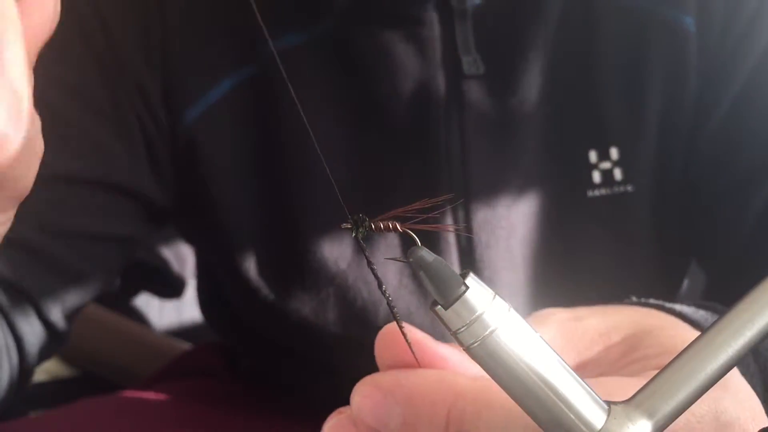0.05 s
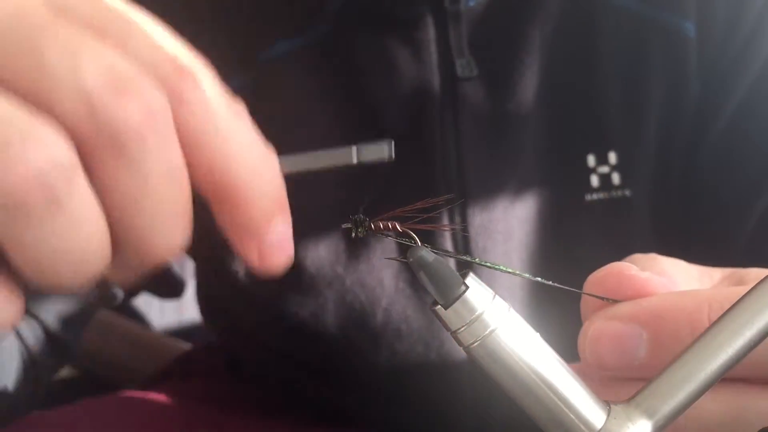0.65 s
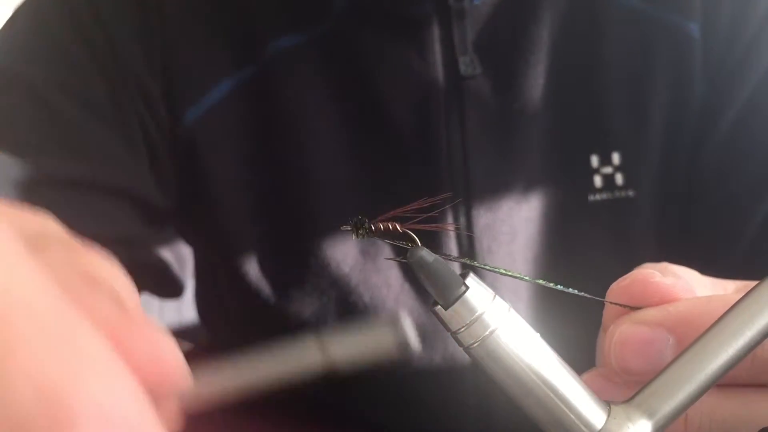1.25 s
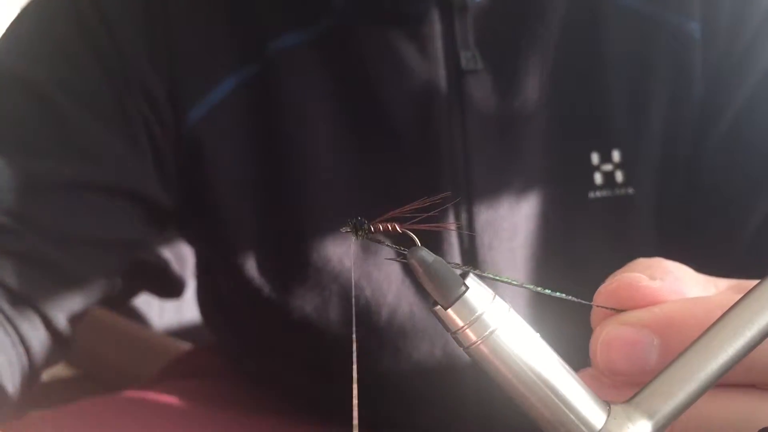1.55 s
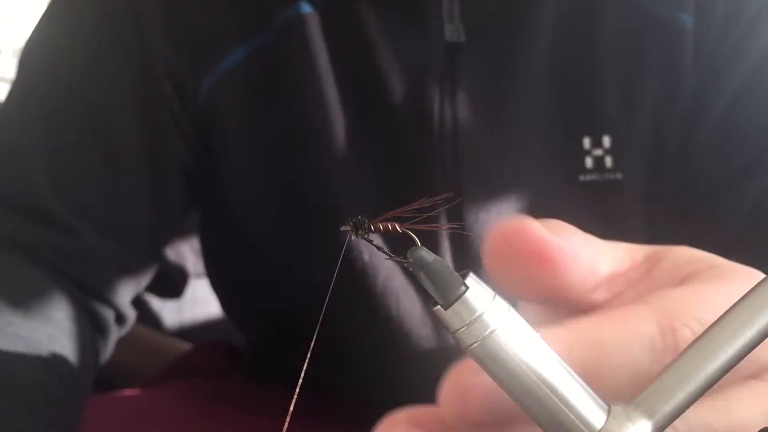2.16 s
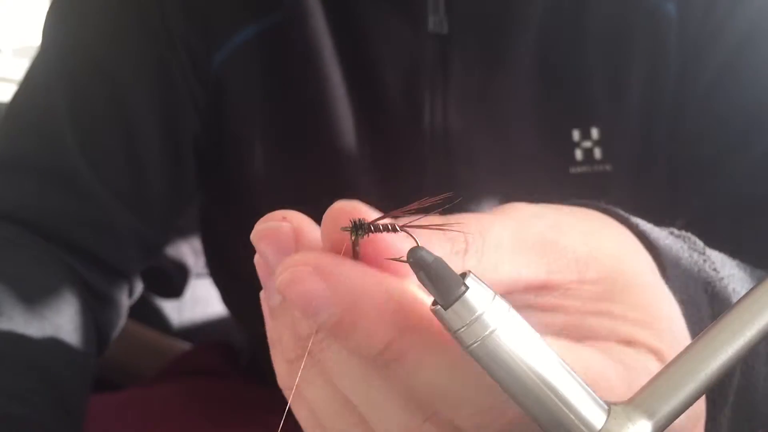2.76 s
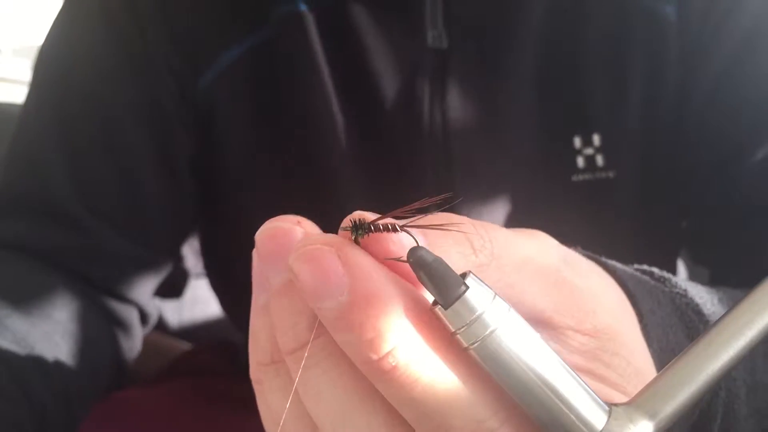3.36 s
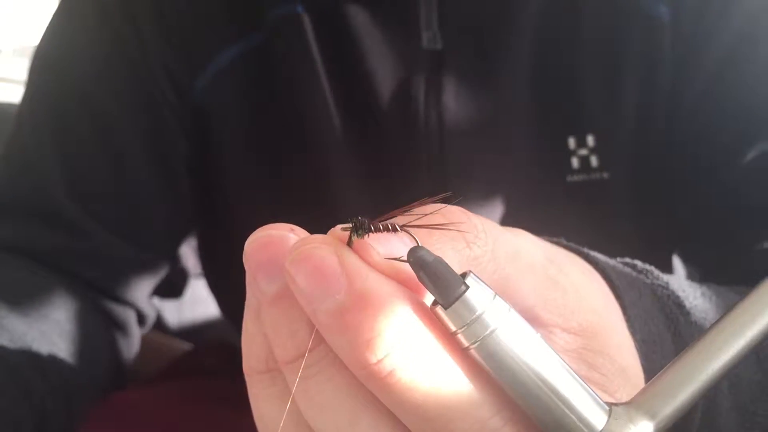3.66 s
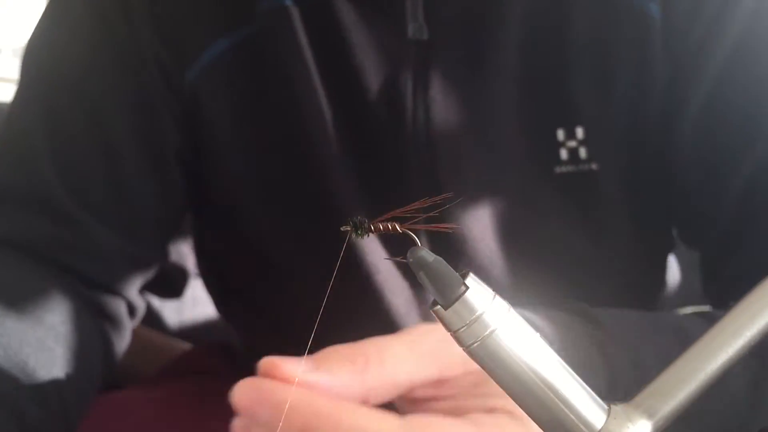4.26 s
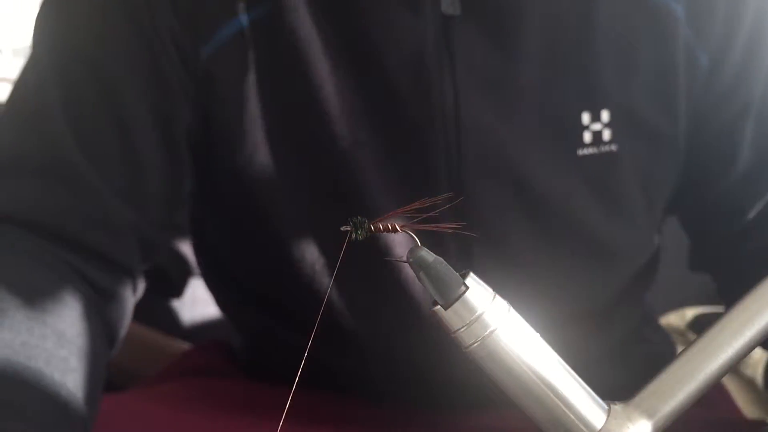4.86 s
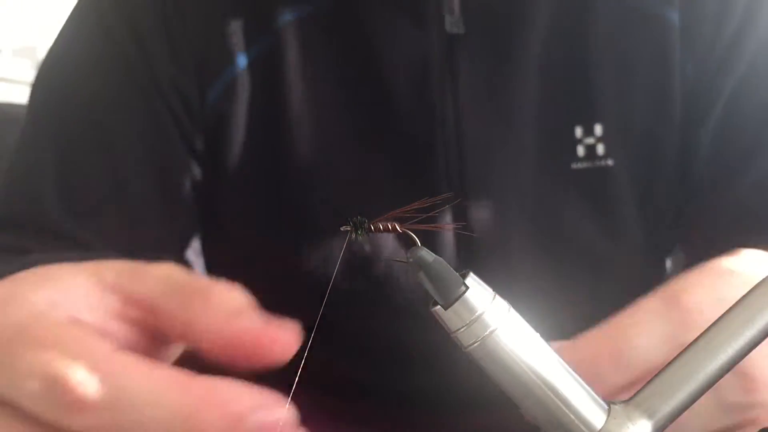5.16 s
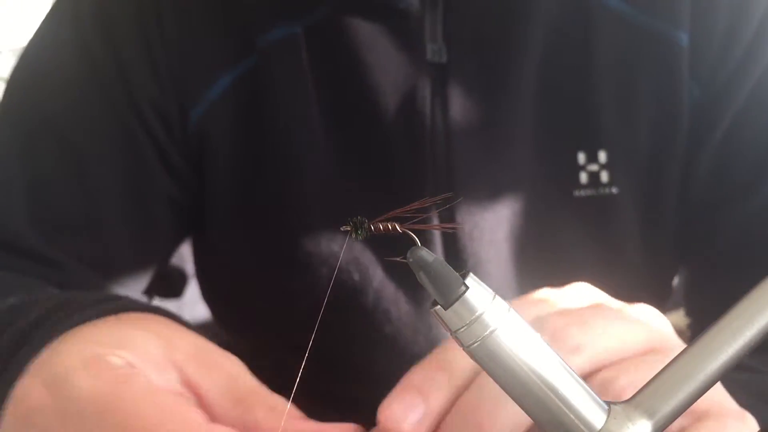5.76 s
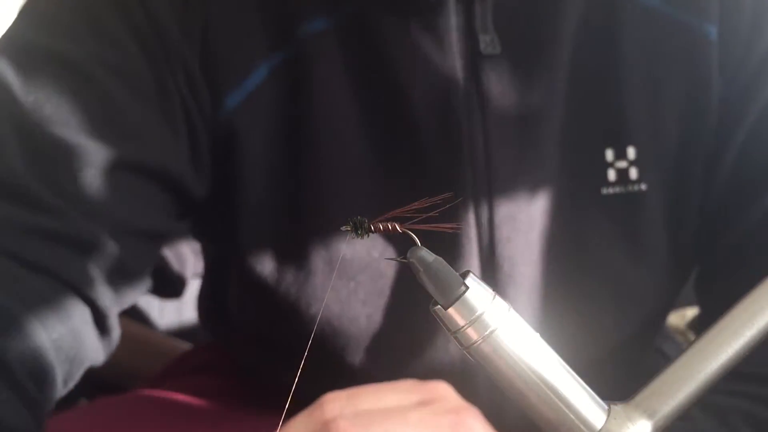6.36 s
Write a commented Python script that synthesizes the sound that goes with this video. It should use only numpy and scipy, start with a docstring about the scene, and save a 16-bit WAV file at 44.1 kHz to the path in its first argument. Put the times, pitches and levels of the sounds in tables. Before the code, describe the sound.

A small room's low rumble and faint hiss run throughout, with everything heard close by. For the first 1.7 seconds, taut thread slips in tiny, very faint creaks as it is wound. At about 1.7 seconds a hand bumps the desk with a dull thump, followed by a faint thin squeak and a soft sleeve brush. From 2.5 to 3 seconds steel tools knock on the desk in a quick, uneven cluster, each ringing briefly, the strongest near the end. A light tick rings the metal vise at 3.9 seconds. At 4.7 seconds a tool clacks sharply, followed by a light tap. Just after 5 seconds comes the loudest sound: a steel tool drops and bounces, ever faster, weaker and duller, settling within a quarter second. Faint low furniture thuds come and go, and sleeves rustle softly from about 6 seconds.

```python
"""Steel tools knock and clack on a desk during fly tying; one is dropped and bounces to rest.
Each hit is a short crack plus ringing tones, and the softer the contact, the duller it sounds.
Quieter are light taps, a tick on the metal vise, a hand bumping the desk and low furniture thuds.
Taut thread creaks as it slips, and sleeves rustle over the low rumble of a small room."""
import sys
import numpy as np
from scipy import signal
from scipy.fft import rfft, irfft
from scipy.io import wavfile
from scipy.ndimage import uniform_filter1d

SR = 44100
rng = np.random.default_rng(int(sys.argv[2]) if len(sys.argv) > 2 else 0)


def master(y):
    """Save y as 16-bit WAV."""
    cut = np.clip(np.atleast_2d(y).T, -1, 1)
    pcm = np.round(cut * 32767)  # scale
    wavfile.write(sys.argv[1], SR, pcm.astype(np.int16))


N = 283122

# Levels in tables are relative. A fade time (t60) is the time a sound takes to fall by 60 dB.
# tools landing (time [s], level [dB], treble limit [Hz], extra ring [dB], extra for second end [dB])
TOOL_KNOCKS = [(2.5104, -25, 2500, 2, -7), (2.518, -12, 6000, 0.5, -7), (2.5342, -9.5, 4700, -1, 1),
               (2.6048, -19.5, 3000, 2, -1), (2.646, -16.5, 2020, -1, 5.5), (2.658, -14, 3880, 4, -9),
               (2.872, -3.5, 2970, -3, -23), (2.8936, -11.5, 1900, -5, -11), (2.9257, -13, 10000, 3, -1)]
# tone of a knock's crack (frequency [Hz], level [dB])
KNOCK_TONE = [(60, -4.5), (140, -3), (210, 4.5), (370, -1.5), (500, 3), (950, 5.5), (1400, 2), (2100, -2),
              (2700, -4.5), (4200, -3), (6000, -5), (16000, -20.5)]
# notes a knock rings with (pitch [Hz], level [dB], fade time [s])
KNOCK_RING = [(189.4, -43, 0.37), (361.4, -39, 0.094), (945, -28, 0.038), (1125, -26.5, 0.033),
              (1666, -34, 0.029), (1750, -33.5, 0.038), (2130, -30, 0.029), (3930, -27, 0.026),
              (4054, -26, 0.026)]


def tool_knocks(second_end_s=.0035, chatter_s=0.059, chatter_db=-17.5, chatter_hz=2800):
    """One end of a tool lands, then the other, and it chatters faintly as it settles."""
    blows = []
    for s, db, contact_hz, ring_db, second_db in TOOL_KNOCKS:
        blows.append((s, db, contact_hz, ring_db))
        blows.append((s + second_end_s, db + second_db, contact_hz, ring_db))
        for delay in chatter_s * rng.random(2):
            blows.append((s + delay, db + chatter_db, min(contact_hz, chatter_hz), ring_db))
    crack, ring = struck(blows, KNOCK_TONE, KNOCK_RING, shudder_db=15.5, shudder_t60=0.019,
                         rise_s=0.00035, spot_db=3.5, detune=0.027)
    return in_room(crack, ring, db=-3.5, room_db=-2, ring_room_db=-7)


# tone of a bounce's crack (frequency [Hz], level [dB])
DROP_TONE = [(60, -25), (130, -1), (190, -3.5), (480, 5.5), (700, 10.5), (1120, 11.5), (1400, 3.5),
             (2000, 0), (3000, -3), (4200, -1.5), (6500, -3.5), (9500, -11), (12500, -17.5), (16000, -2)]
# notes of the dropped tool (pitch [Hz], level [dB], fade time [s])
DROP_RING = [(276.5, -40.5, 0.23), (892, -36, 0.09), (1144, -27, 0.07), (1472, -48, 0.22),
             (1633, -46, 0.16), (1830, -56.5, 0.072), (2180, -20, 0.013), (3920, -14.5, 0.0079),
             (5460, -24, 0.021), (6600, -19.5, 0.019), (9080, -29.5, 0.03), (11050, -40, 0.12),
             (11028, -40.5, 0.18), (12100, -16, .006), (13620, -32, 0.11), (13610, -32.5, 0.12),
             (15610, -32.5, .045)]


def dropped_tool(start_s=5.0533, first_flight_s=.0441, rebound=.757, loss_db=3, ring_db=-6):
    """A steel tool keeps only part of its speed at each bounce, so each comes sooner and weaker."""
    bounce = np.arange(14)
    speed = rebound ** bounce
    times = start_s + first_flight_s * (1 - speed) / (1 - rebound)
    levels = 6 - loss_db * bounce
    contact_hz = 16400 * np.tanh(speed / 0.22)  # the slow, last bounces turn dull
    blows = [(s, db, hz, ring_db) for s, db, hz in zip(times, levels, contact_hz)]
    crack, ring = struck(blows, DROP_TONE, DROP_RING, shudder_db=14, shudder_t60=0.018,
                         rise_s=0.00083, spot_db=1.5)
    return in_room(crack, ring, db=-6, room_db=-3, ring_room_db=-13)


# one hard hit (time [s], level [dB], treble limit [Hz], extra ring [dB])
TOOL_CLACKS = [(4.7283, -4, 15500, 1.5)]
# tone of its crack (frequency [Hz], level [dB])
CLACK_TONE = [(60, -20), (200, 6.5), (350, 8), (600, 9), (780, -10), (950, 1), (1300, 3), (1900, 6.5),
              (2500, -4), (3400, -3.5), (4300, 4.5), (6000, -5), (16000, -18.5)]
# notes it rings with (pitch [Hz], level [dB], fade time [s])
CLACK_RING = [(975, -15.5, .018), (1574, -28, 0.055), (1902, -32.5, 0.02), (1954, -26.5, 0.028),
              (3020, -27.5, 0.042), (3990, -21, 0.018), (4400, -19, 0.014)]


def tool_clack():
    """A harder steel tool clacks once on the desk."""
    crack, ring = struck(TOOL_CLACKS, CLACK_TONE, CLACK_RING, shudder_db=22.5, shudder_t60=0.021,
                         rise_s=0.00044, spot_db=1, ripple_hz=110)
    return in_room(crack, ring, db=-5, room_db=-2.5, ring_room_db=-7)


# touches of steel (time [s], level [dB], treble limit [Hz], extra ring [dB])
STEEL_TAPS = [(2.837, -35.5, 1400, 1), (4.876, -33.5, 1500, -7.5), (4.9142, -18.5, 16300, -0.5),
              (5.0255, -6, 600, -17.5), (5.035, -31.5, 12200, -4.5)]
# tone of a tap's crack (frequency [Hz], level [dB])
TAP_TONE = [(100, -37), (500, -11), (850, -3), (1300, 3), (4200, -4), (9000, -4.5), (16000, -4)]
# notes a tap rings with (pitch [Hz], level [dB], fade time [s])
TAP_RING = [(850, -9, 0.015), (870, -18, 0.028), (4260, -18, 0.013), (6480, -27, 0.013),
            (13700, -43.5, 0.077)]


def steel_taps():
    """Light taps and soft touches make steel ring briefly."""
    crack, ring = struck(STEEL_TAPS, TAP_TONE, TAP_RING, shudder_db=11.5, shudder_t60=0.021,
                         rise_s=0.00079, spot_db=2.5)
    return in_room(crack, ring, db=-0.5, room_db=-4, ring_room_db=-4.5)


# contacts with the vise (time [s], level [dB], treble limit [Hz], extra ring [dB])
VISE_TICKS = [(3.872, -37, 16000, -2), (3.8749, -27.5, 15800, 15), (3.8808, -29.5, 4030, 8.5)]
# tone of the tick's crack (frequency [Hz], level [dB])
TICK_TONE = [(100, -15), (700, 11.5), (1600, -1), (2500, 2), (6000, 8), (9000, 2), (14000, -1), (16000, -3)]
# notes of the vise (pitch [Hz], level [dB], fade time [s])
VISE_RING = [(1087, -23, 0.11), (1360, -15.5, 0.039), (1754, -20, 0.018), (3220, -34.5, 0.059),
             (4910, -42, 0.041), (11370, -35, 0.026), (14000, -25, .022)]


def vise_tick():
    """Three quick contacts blend into one light tick that rings the metal vise."""
    crack, ring = struck(VISE_TICKS, TICK_TONE, VISE_RING, shudder_db=10, shudder_t60=0.06,
                         rise_s=0.0046, spot_db=2.4)
    return in_room(crack, ring, db=-1.5, room_db=-13.5, ring_room_db=-3)


# a hand meeting the desk (time [s], level [dB], treble limit [Hz], extra ring [dB])
HAND_BUMPS = [(1.721, -16, 12100, 7.5), (1.7435, -26.5, 14000, -8), (1.7565, -18.5, 950, 0),
              (1.934, -37.5, 3980, 8)]
# tone of a bump (frequency [Hz], level [dB])
BUMP_TONE = [(40, -15), (130, 8.5), (350, 12), (700, 8), (1100, -5.5), (1800, -2), (2800, -15.5),
             (4500, -13), (7000, -19.5), (16000, -22)]
# notes of the desk (pitch [Hz], level [dB], fade time [s])
DESK_RING = [(115, -36.5, 0.17), (144.7, -27, 0.1), (175, -27.5, 0.1), (335, -25, 0.038)]


def hand_bumps():
    """A hand bumps the desk, which answers with low notes."""
    crack, ring = struck(HAND_BUMPS, BUMP_TONE, DESK_RING, shudder_db=-1, shudder_t60=0.061,
                         rise_s=0.0049, spot_db=1)
    return in_room(crack, ring, db=2, room_db=-11.5, ring_room_db=3)


def struck(blows, tone, notes, shudder_db, shudder_t60, rise_s, spot_db, detune=0, ripple_hz=350):
    """Each blow makes a crack (a click and a brief noisy shudder) and a ring; returns both."""
    cracks, rings = np.zeros((2, N))
    t = np.arange(SR // 3) / SR
    brief = t[:SR // 10]
    pulse = click(tone)
    hz, level_db, t60 = np.transpose(notes)[:, :, None]
    fades = amp(level_db - 60 * t / t60) * (1 - np.exp(-t / rise_s))
    for s, db, contact_hz, ring_db in blows:
        shudder = rng.choice([-1., 1.], len(brief)) * amp(-60 * brief / shudder_t60)
        shudder *= amp(shudder_db) / np.linalg.norm(shudder)
        shudder[0] = 1  # the click of first contact
        crack = np.convolve(whitened(shudder, ripple_hz, size=8192), pulse)
        add(cracks, s, amp(db) * soften(crack, contact_hz, order=3))
        # the spot that is hit favours some notes; the fingers' grip can shift their pitch
        spot, grip = rng.standard_normal((2, len(notes), 1))
        waves = np.sin(2 * np.pi * hz * (1 + detune * grip) * t)
        ring = np.sum(amp(spot_db * spot) * fades * waves, axis=0)
        add(rings, s, amp(db + ring_db) * soften(ring, contact_hz, order=3))
    return cracks, rings


# the clearest slips of the thread (time [s], level [dB], pitch [Hz])
THREAD_SLIPS = [(0.047, -55, 1740), (0.092, -58, 1750), (.275, -61.5, 1780), (0.92, -52, 1710),
                (1.109, -60.5, 1700), (1.218, -61.5, 1690), (1.932, -52.5, 1770)]
# notes of its thin squeak (pitch [Hz], level [dB], fade time [s])
SQUEAK_NOTES = [(9500, -47, 0.033), (4360, -61, .055)]


def thread(slip_t60=0.038, squeak_s=1.8387, rough=0.47, rise_s=0.0011):
    """Taut thread slips in short, rough pips as it is wound, then squeaks once as it is drawn tight."""
    out, t = np.zeros(N), np.arange(SR // 10) / SR
    faint = while_winding(per_s=11, db=-69.5, hz=1723)
    pips = [(s, db, hz, slip_t60) for s, db, hz in [*THREAD_SLIPS, *faint]]
    pips += [(squeak_s, db, hz, t60) for hz, db, t60 in SQUEAK_NOTES]
    for s, db, hz, t60 in pips:
        wobble = rough * flutter(len(t), smooth_samples=60)
        fade = amp(db - 60 * t / t60) * (1 - np.exp(-t / rise_s))
        add(out, s, fade * np.sin(2 * np.pi * hz * t + wobble))
    return out


def while_winding(per_s, db, hz, start_s=0.082, end_s=1.65, spread_db=2, detune=0.026):
    """Small, loosely even events as the thread is wound (time [s], level [dB], pitch [Hz])."""
    place, strength, pitch = rng.uniform(-1, 1, (64, 3)).T
    times = start_s + (np.arange(len(place)) + .5 + .5 * place) / per_s
    events = np.column_stack([times, db + spread_db * strength, hz * (1 + detune * pitch)])
    return events[times < end_s]


# the desk and chair giving way a little (middle time [s], length [s], level [dB], pitch [Hz])
FURNITURE_THUDS = [(2.027, 0.11, -60.5, 91), (2.16, .09, -57, 72.6), (3.201, .16, -64, 289.4),
                   (3.948, 0.12, -61.5, 125.4), (4.764, 0.099, -55.5, 81.3), (5.064, 0.09, -57, 85.3),
                   (5.067, 0.0349, -42, 201.4), (5.854, 0.44, -70, 280), (5.953, .1, -57.5, 96.7)]


def thuds(nudge_s=.08, rough=0.7):
    """Furniture gives under a push, a landing tool or the thread's pull: a few uneven, low swings."""
    out = np.zeros(N)
    nudges = [(s, nudge_s, db, hz) for s, db, hz in while_winding(per_s=5.1, db=-60.5, hz=67.2)]
    for s, length, db, hz in FURNITURE_THUDS + nudges:
        t = np.arange(int(length * SR)) / SR
        wobble = rough * noise([(20, 0), (60, 0), (150, -40), (400, -90)], size=SR)[:len(t)]
        swell = amp(db) * np.hanning(len(t))
        add(out, s - length / 2, swell * np.sin(2 * np.pi * hz * t + wobble))
    return out


# sleeves and fingers brushing (middle time [s], length [s], level [dB], brightness [dB per octave])
SLEEVE_STROKES = [(2.068, 0.019, -60.5, 8.5), (2.13, 0.36, -69.5, 0), (2.721, 0.061, -67.5, 8.5),
                  (4.407, 0.3, -72, -0.5), (6.216, 0.39, -67.5, 4.5), (6.376, 0.44, -71.5, 4)]
# tone of rubbed cloth (frequency [Hz], level [dB])
CLOTH_TONE = [(300, -4.5), (1500, -9), (3000, -0.5), (4800, -8.5), (6300, -6), (8000, -15), (10000, -17),
              (16000, -25.5)]


def sleeves(grain_db=2):
    """Strokes of cloth swell and fade, grainy where fibres catch."""
    out = np.zeros(N)
    for s, length, db, tilt_db in SLEEVE_STROKES:
        size = int(length * SR)
        grain = amp(grain_db * flutter(size, smooth_samples=120))
        rustle = evened(noise(CLOTH_TONE, size, tilt_db) * grain)
        add(out, s - length / 2, amp(db) * np.hanning(size) * rustle)
    return out


# tone of the rumble and hiss (frequency [Hz], level [dB])
BACKGROUND_TONE = [(15, -32), (25, -14.5), (50, -3), (73, 2), (100, -2.5), (160, -9), (195, -4), (240, -11),
                   (500, -21), (1200, -24), (1750, -24), (5000, -29), (10500, -34), (16000, -35)]


def background(rumble_below_hz=97, ease_db_per_s=0.5):
    """Room rumble that slowly eases, and steady microphone hiss."""
    floor = amp(-68) * noise(BACKGROUND_TONE, N)
    rumble = signal.sosfiltfilt(signal.butter(2, rumble_below_hz, fs=SR, output="sos"), floor)
    hiss = floor - rumble
    return hiss + rumble * amp(-ease_db_per_s * np.arange(N) / SR)


# echoes from nearby surfaces (delay [s], strength [ratio])
DESK_ECHOES = [(.0048, 0.087), (0.0115, 0.12), (0.0184, 0.17)]


def with_echoes(x):
    """The desk top and the things on it return quick, dulled echoes."""
    out, dull = x.copy(), soften(x, 14000)
    for delay, gain in DESK_ECHOES:
        add(out, delay, gain * dull)
    return out


# how long sound lingers in the room (frequency [Hz], fade time [s])
ROOM_FADE = [(100, 0.53), (400, 0.24), (1500, 0.31), (4000, 0.35), (8000, 0.29), (16000, 0.078)]
# tone of that lingering sound (frequency [Hz], level [dB])
ROOM_TONE = [(100, -6.5), (600, -3), (1500, 2.5), (2500, 7), (5000, -5), (9000, -6), (16000, -19)]


def room_tail(x, build_s=0.0026, ripple_hz=80):
    """Many echoes blur into a tail that builds quickly; each frequency band dies at its own speed."""
    hz, t, bands = signal.stft(rng.standard_normal(2 * SR // 3), SR, nperseg=256)
    fades = amp(-60 * t / read(ROOM_FADE, hz)[:, None])
    tail = signal.istft(bands * fades, SR)[1]
    tail *= 1 - np.exp(-(np.arange(len(tail)) / SR / build_s) ** 2)
    tail = signal.fftconvolve(whitened(tail, ripple_hz), click(ROOM_TONE))
    return signal.fftconvolve(x, tail)[:N]


def in_room(crack, ring, db, room_db, ring_room_db):
    """The broad desk top sends the crack into the room; small ringing parts carry less far."""
    direct = with_echoes(crack + ring)
    tail = room_tail(with_echoes(crack + amp(ring_room_db) * ring))
    return amp(db) * (direct + amp(room_db) * tail)


def amp(db):
    """Turns decibels into a multiplier."""
    return 10 ** (np.asarray(db) / 20)


def evened(x):
    """Scales a signal to an average strength (rms) of 1."""
    return x / np.sqrt(np.mean(x ** 2) + 1e-20)


def read(points, hz):
    """Reads between a table's rows on a log-frequency scale."""
    f, value = np.transpose(points)
    return np.interp(np.log(hz + 1), np.log(f + 1), value)


def add(mix, s, sound):
    """Mixes a sound in at time s."""
    part = mix[max(round(s * SR), 0):][:len(sound)]
    part += sound[:len(part)]


def flutter(size, smooth_samples):
    """A smoothed random wiggle."""
    return evened(uniform_filter1d(rng.standard_normal(size), size=smooth_samples))


def noise(tone, size, tilt_db=0):
    """Noise with a given tone, brightened by tilt_db per octave."""
    hz = np.fft.rfftfreq(size, 1 / SR)
    gain = amp(read(tone, hz) + tilt_db * np.log2(hz + 1))
    return evened(irfft(rfft(rng.standard_normal(size)) * gain, size))


def click(tone, size=2048):
    """A click with a given tone."""
    hz = abs(np.fft.fftfreq(size, 1 / SR))
    return sharp_pulse(amp(read(tone, hz)))


def soften(x, hz, order=2):
    """Cuts the treble above hz, as a softer, longer contact does."""
    return signal.sosfilt(signal.butter(order, min(hz, .47 * SR), fs=SR, output="sos"), x)


def sharp_pulse(gain):
    """A pulse with this gain at each frequency and its energy as early as possible."""
    spectrum = np.exp(np.conj(signal.hilbert(np.log(gain))))
    return np.fft.ifft(spectrum).real[:len(gain) // 2]


def whitened(x, width_hz, size=32768):
    """Evens out a noise from bass to treble, keeping only ripples narrower than width_hz."""
    power = abs(np.fft.fft(x, size)) ** 2
    smooth = uniform_filter1d(power, int(width_hz * size / SR) + 1, mode="wrap")
    return signal.fftconvolve(x, sharp_pulse((smooth + 1e-9) ** -.5))[:len(x)]


def scene():
    """Adds the hits and the quieter sounds into one channel."""
    hits = tool_knocks() + dropped_tool() + tool_clack() + steel_taps() + vise_tick() + hand_bumps()
    return (hits + thread() + thuds() + sleeves() + background())[None]


def record(dry, low_cut_hz=32, high_cut_hz=15950):
    """The microphone loses the deepest bass, and the recorder the highest treble."""
    thinned = signal.sosfilt(signal.butter(2, low_cut_hz, "highpass", fs=SR, output="sos"), dry)
    treble_cut = signal.firwin(511, high_cut_hz, window=("kaiser", 9), fs=SR)
    return signal.oaconvolve(thinned, treble_cut[None], "same")


dry = scene()
out = record(dry)
master(out)
```